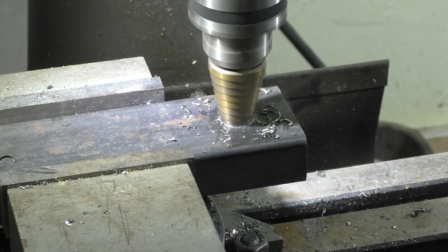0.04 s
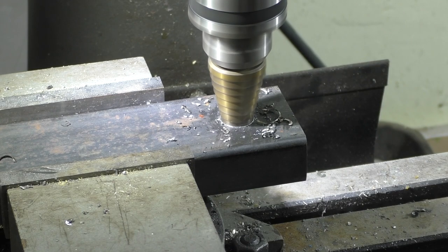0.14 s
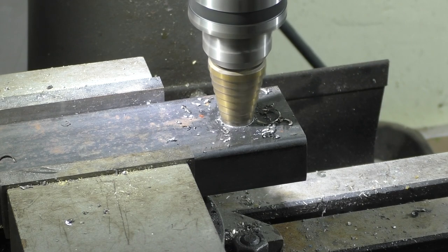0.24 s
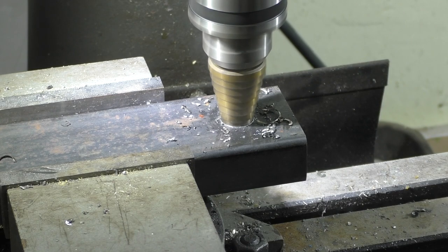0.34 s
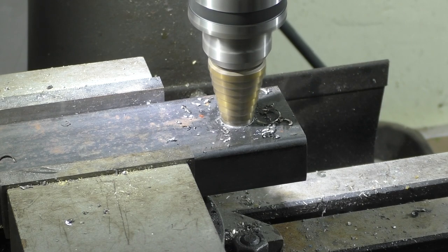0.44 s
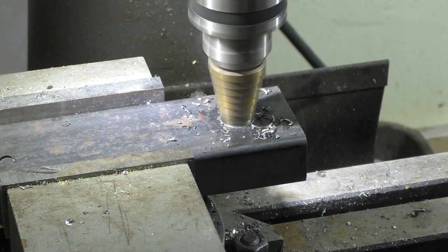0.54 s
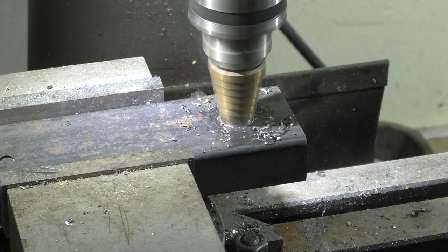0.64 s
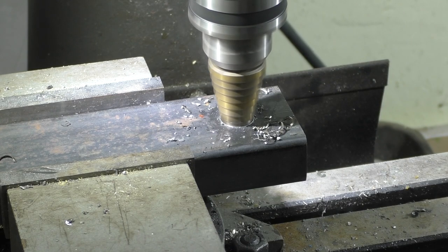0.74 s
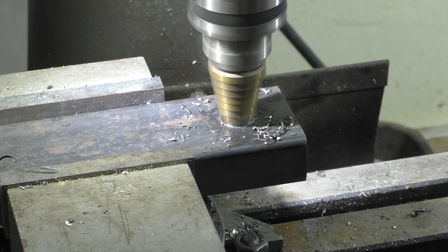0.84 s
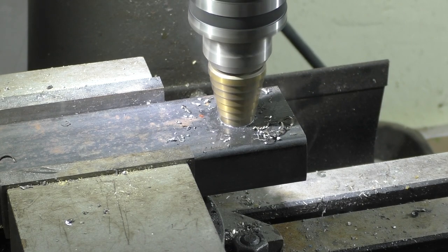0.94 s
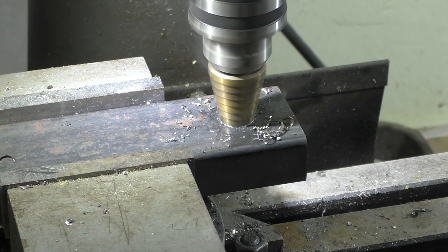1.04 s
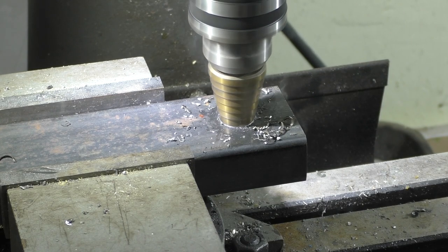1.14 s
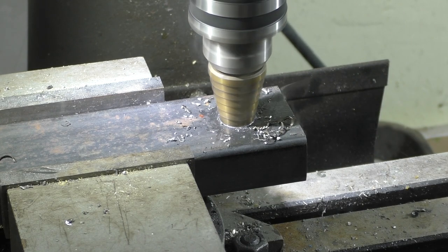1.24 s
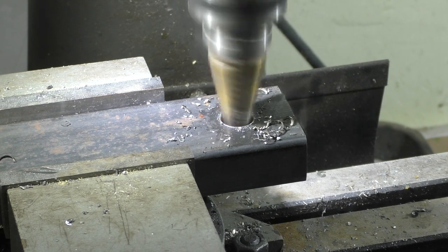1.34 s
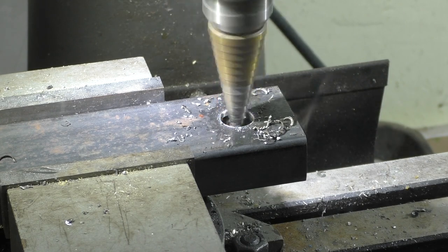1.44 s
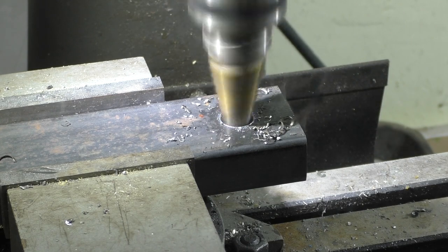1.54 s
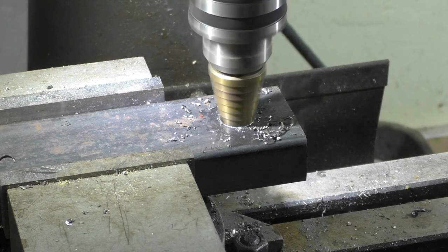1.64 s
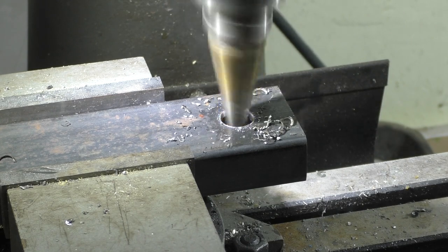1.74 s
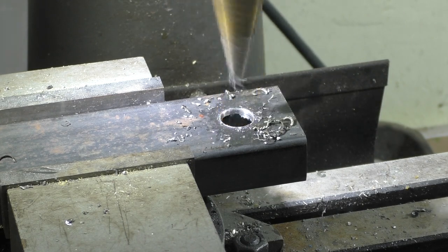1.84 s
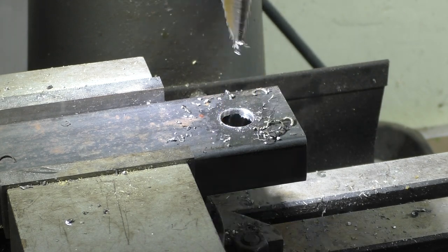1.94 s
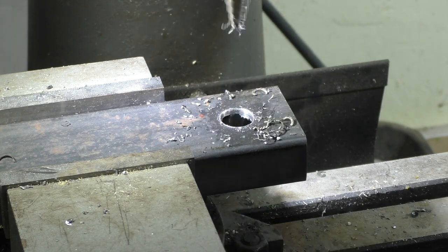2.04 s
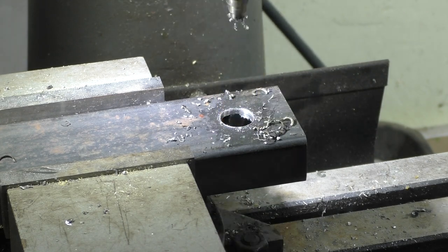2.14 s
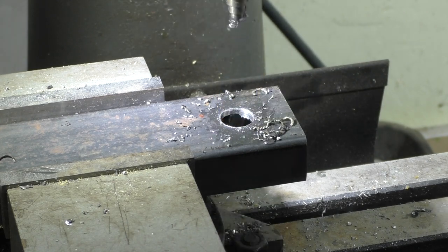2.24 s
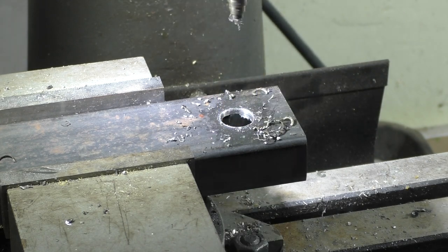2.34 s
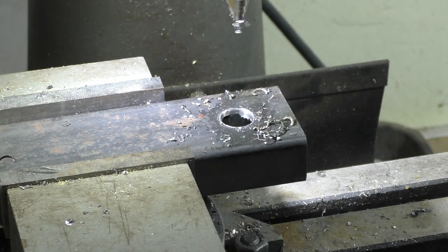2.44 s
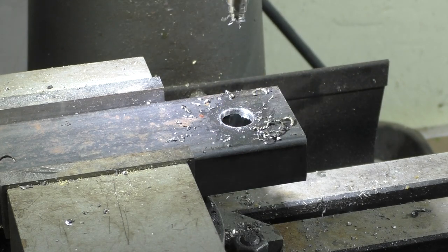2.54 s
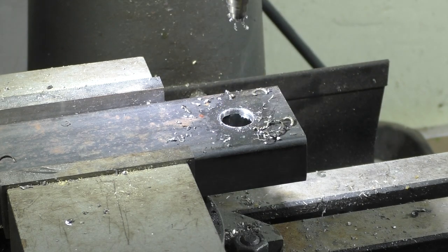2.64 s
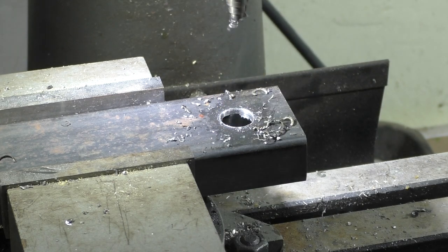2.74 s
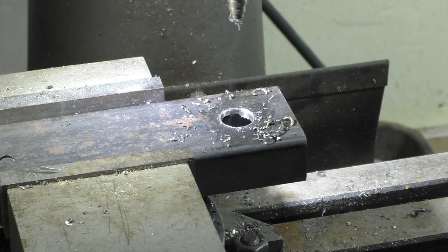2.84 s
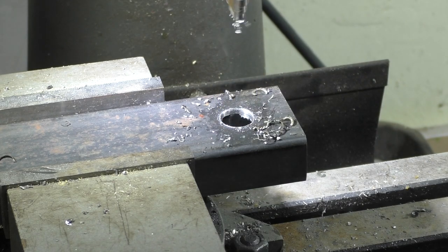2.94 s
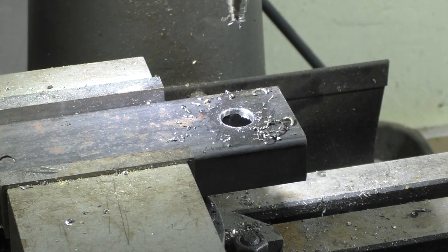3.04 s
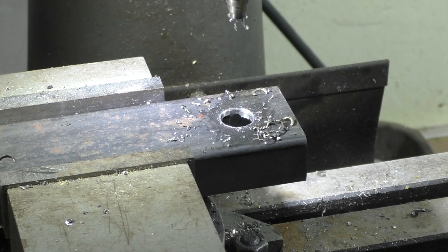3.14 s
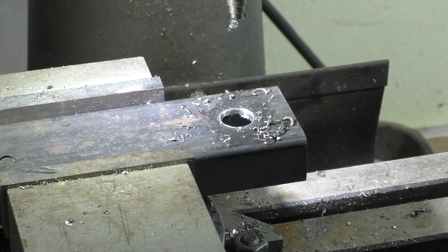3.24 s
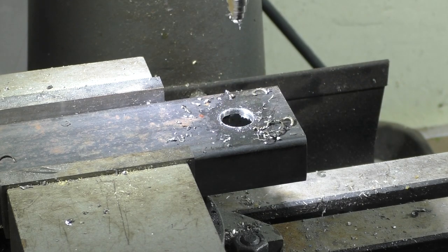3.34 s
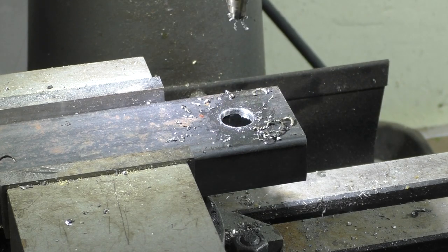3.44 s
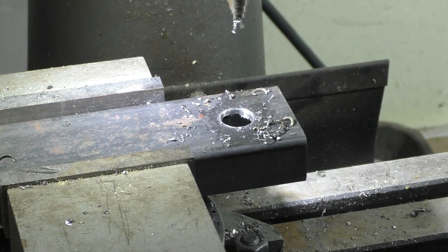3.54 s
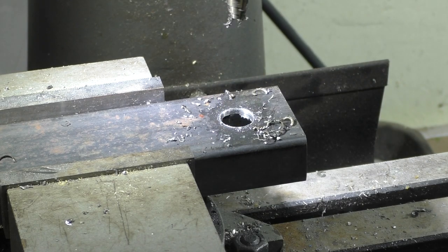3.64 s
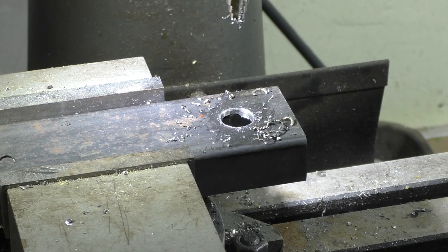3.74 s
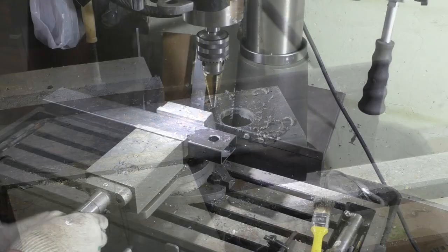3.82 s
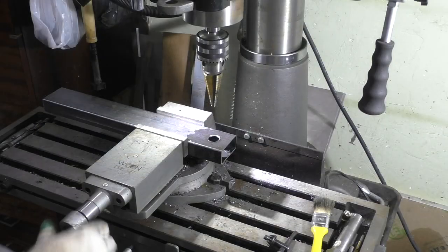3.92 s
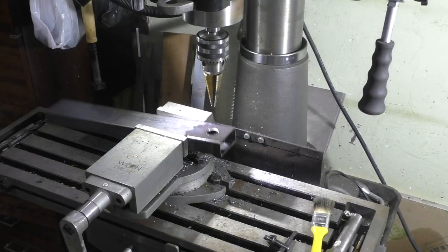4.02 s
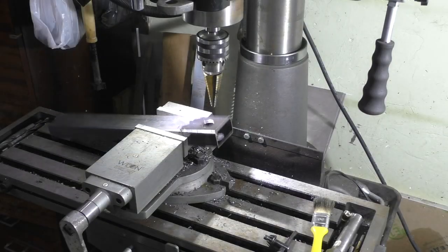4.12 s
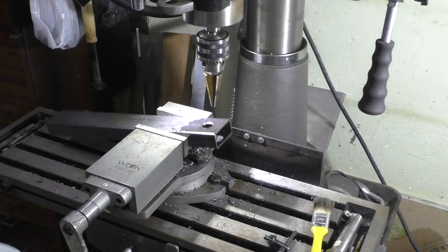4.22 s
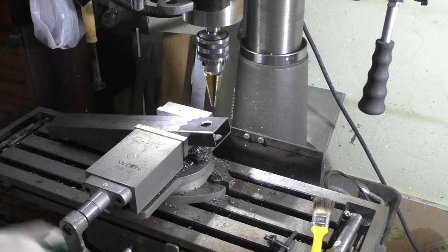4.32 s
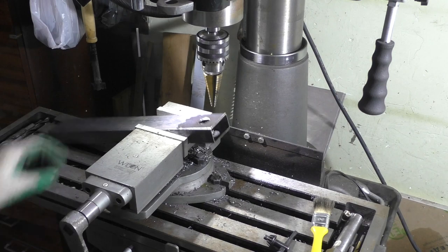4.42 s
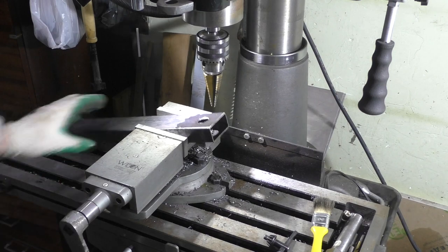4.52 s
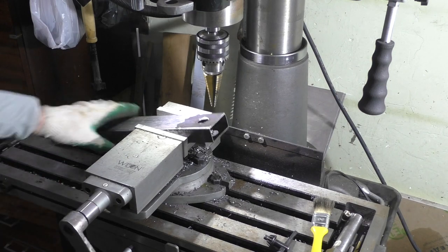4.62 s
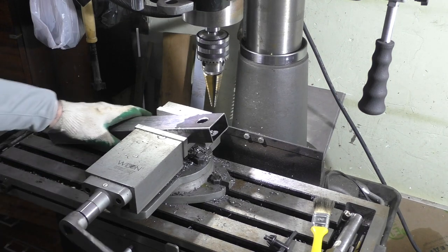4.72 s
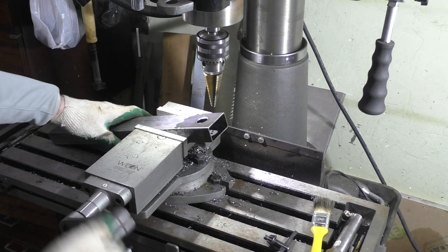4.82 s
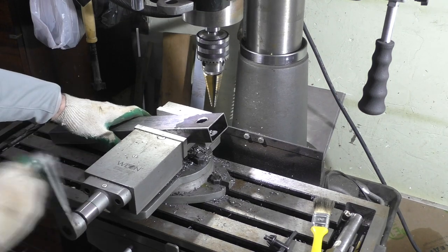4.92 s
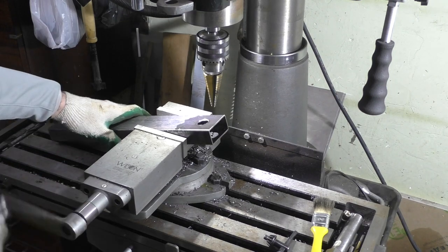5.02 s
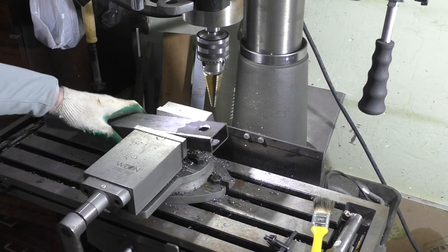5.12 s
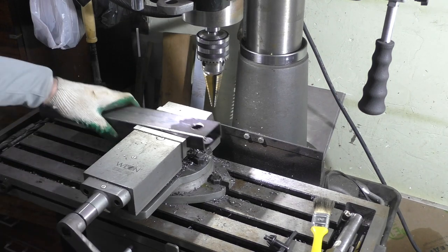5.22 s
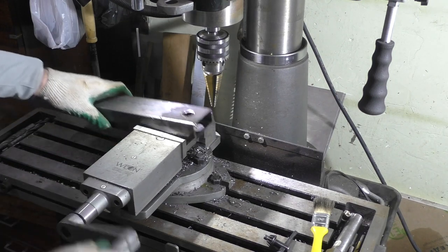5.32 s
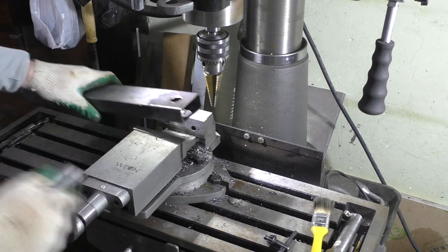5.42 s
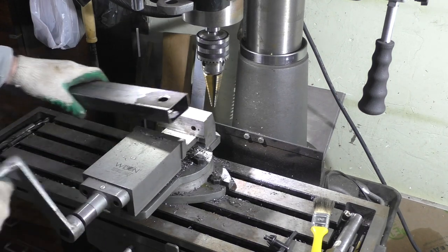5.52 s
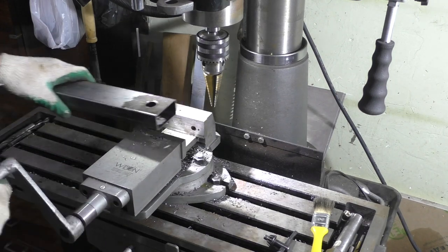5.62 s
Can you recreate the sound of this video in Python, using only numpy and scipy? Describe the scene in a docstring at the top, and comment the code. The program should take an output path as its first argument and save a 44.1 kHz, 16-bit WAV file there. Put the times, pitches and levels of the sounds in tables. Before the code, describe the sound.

Harsh metallic drilling with a low groan, a quiet motor whir, a switch clack, then several bright steel knocks as a tube is removed.

```python
"""A step drill cuts a steel tube: random tiny fractures, coloured and resonated, groan, grind, scrape, fizz.
A drill press hums and whirs (sines, coloured crackle); the bit bites twice more, the last time briefly.
The switch clacks (shaped impulse) and chips swish (crackle through steel modes). The loosened tube drops
and bounces on the vise: each knock clacks and rings decaying paired modes, until a gloved hand stills it
and lifts it out with a last knock. Early echoes and decaying noise tails form a small workshop."""
import sys
import numpy as np
from scipy import signal
from scipy.fft import rfft, irfft, next_fast_len
from scipy.io import wavfile
from scipy.ndimage import map_coordinates

SR = 44100
rng = np.random.default_rng(int(sys.argv[2]) if len(sys.argv) > 2 else 0)


def to_wav(s):
    """Save 16-bit WAV."""
    ch = np.atleast_2d(s).T  # columns
    pcm = np.round(np.clip(ch, -1, 1) * 32767)  # PCM
    wavfile.write(sys.argv[1], SR, pcm.astype(np.int16))


N = 250047
TIME = np.arange(N) / SR

# Levels in dB are relative; stages that share a sound add up.
# Room noise colour: hz, gain_db
AIR_COLOUR = [(25, -23), (90, -14.5), (180, -5.5), (400, -1.5), (800, -11.5), (2500, -11), (5000, -27),
              (15000, -31.5)]
# Room noise level: time_s, level_db
AIR_LEVEL = [(3.3, -74.5), (3.85, -74.5), (4.15, -70.5), (4.9, -80), (5.18, -78), (5.45, -74.5)]
# Workshop decay: hz, t60_s
ROOM_DECAY = [(200, 0.55), (600, 0.3), (3500, 0.39), (9000, 0.33), (16000, 0.12)]
TOP_HZ = 15500

# Mains hum partials: hz, level_db, waver_db
HUM_PARTIALS = [(100, 1, 0.8), (150.7, -16.5, 3.5), (203, -10, 3.5), (301.3, -6, 3)]
# Hum level: time_s, level_db
HUM_LEVEL = [(0, -56.5), (.8, -57), (1.35, -56), (1.68, -60.5), (2.22, -60.5), (2.34, -55), (2.56, -59),
             (3.3, -62)]
# Belt and bearing tones: hz, level_db
WHINE_TONES = [(748.3, -67.5), (769.8, -64), (872.1, -71), (926, -70), (1147, -67.5), (1193, -65),
               (3499, -78)]
# Whine level: time_s, level_db
WHINE_LEVEL = [(2.1, -8.5), (2.33, -6.5), (2.52, -15), (2.7, -3), (2.92, -8.5), (3.2, -9)]
# Spindle whir colour: hz, gain_db
WHIR_COLOUR = [(71, -34), (120, -13), (130, -14), (300, -2.5), (602, -13.5), (765, 2), (1030, -7),
               (1190, -1), (1360, -13), (1650, -10), (1850, -16.5), (2150, -14.5), (2790, -40),
               (3520, -18.5), (4680, -57.5), (12400, -68), (14000, -85)]
# Whir level: time_s, level_db
WHIR_LEVEL = [(2.05, -5), (2.48, -5.5), (2.7, -5), (2.95, -4), (3.2, -5)]
POWER_OFF_S, HUM_FALL_DB_PER_S = 3.36, 220
QUILL_UP_S, WHIR_DOWN_DB, WHIR_UP_DB = 2.02, -60.5, -54  # louder with the quill raised
COAST_DB_PER_S = 93  # run-down after the switch
# Pulley guard rattle colour: hz, gain_db
RATTLE_COLOUR = [(1500, -30), (2500, -2), (3100, -3), (3600, 2.5), (4150, -2.5), (4600, -16), (8000, -33),
                 (14000, -43)]
BELT_PASS_S, BELT_LAPS_PER_S, BELT_DB, BELT_SHARPNESS = 2.8, 5.77, -70, 1.8

# Switch clack colour: hz, gain_db
SWITCH_COLOUR = [(100, -60), (240, -12.5), (400, -23), (650, -13), (1000, -14), (1130, 3.5), (1320, 4),
                 (1500, -3), (1950, 3.5), (2350, -2.5), (2900, 0), (3500, -6), (4200, -12.5), (7000, -21),
                 (13000, -29), (16000, -49)]
# Housing shiver colour: hz, gain_db
HOUSING_COLOUR = [(60, -20), (250, -5.5), (600, -4), (1000, -5.5), (1300, 1.5), (2200, -5), (3000, -7.5),
                  (4400, -12), (5000, -22), (9000, -29), (16000, -43)]
# Housing panel resonances: hz, width_hz, level_db
CASING_MODES = [(1140, 40, -1), (1320, 58, 3), (1900, 70, 2), (2730, 90, -8), (2900, 70, -5),
                (3400, 80, -6)]
SWITCH_S, SWITCH_DB = 3.295, 1.5
HOUSING_DB, HOUSING_FALL_DB_PER_S = -37.5, 177
LEVER_LEAD_S, LEVER_LENGTH_S, LEVER_DB = 0.016, 0.031, -51.5

# Swarf hiss colour: hz, gain_db
SWISH_COLOUR = [(1060, -50), (2200, -39), (2800, -11), (3380, -2.5), (4830, 0.5), (5490, 2), (12000, -4),
                (16000, -8)]
# Resonances of the steel under the chips: hz, width_hz, level_db
PLATE_MODES = [(689.5, 12, 3.5), (730, 46, 1.5), (1238, 27, -5.5), (1706, 58, -13.5), (2024, 35, -16),
               (2420, 65, -2.5), (2557, 66, -4), (3330, 96, -1.5), (3480, 78, -4), (4140, 25, -5),
               (4520, 28, -1), (5560, 140, 4.5)]
# Chips sliding on: centre_s, length_s, level_db
SKITTER = (3.695, 0.088, -53)
FLICK_S, FLICK_DB, FLICK_RISE_DB_PER_S, FLICK_FALL_DB_PER_S = 3.647, -33, 1397.5, 405

# Steel contact colour: hz, gain_db
CONTACT_COLOUR = [(40, -57.5), (300, -43.5), (550, -31), (850, -18.5), (1400, -11.5), (2300, 2), (3100, -2),
                  (4500, -16.5), (9000, -22), (12000, -22.5), (16000, -39.5)]
# Rising quill jolts, then meets its stop: time_s, level_db
QUILL_KNOCKS = [(2.021, -48), (2.239, -17)]
# Tube meets vise: time_s, clack_db, ring_db, tilt_db_per_octave, clang_hz, focus_lift_db
KNOCKS = [(4.003, -38, -70, 0.5, 2430, 22.5), (4.041, -28, -61.5, 0, 2490, 11.5),
          (4.071, -31.5, -64, 8.5, 2400, 9), (4.2053, -7, -38, -1.5, 2570, -0.5),
          (4.385, -10, -40.5, 2, 2390, 1.5), (4.5231, -13.5, -40, 2.5, 2550, 2),
          (4.6416, -13.5, -41, 2, 2600, 2), (4.7471, -14.5, -41, 1, 2770, 3),
          (4.819, -17, -45.5, 2, 2400, 8.5), (4.858, -19.5, -44.5, 0.7, 3000, 10),
          (5.269, -19.5, -57.5, 3, 2890, 12), (5.276, -25.5, -52, 3.5, 1900, 8)]
# Free tube wall modes: hz, level_db
TUBE_MODES = [(1284, -12), (1390, -21), (1745, -12), (1945, -7), (2037, -7), (2140, -7), (2280, -7),
              (2322, -14), (2482, -8), (2560, -17), (2662, -9), (2744, -4), (2899, -9), (3045, -11),
              (3154, -14), (3290, -21), (3422, -7), (3634, -10), (3784, -12), (3855, -14), (4199, -23),
              (4350, -12), (4510, -16), (4646, -15), (4910, -21), (5160, -21), (5482, -19), (5720, -17),
              (6094, -18), (6311, -19), (6720, -27), (6912, -21), (7073, -28), (7429, -28), (7577, -24),
              (7708, -29), (8170, -30), (8367, -30), (8452, -30), (8657, -28), (8745, -28), (9012, -26),
              (9151, -23), (9474, -30), (9681, -22), (10433, -25), (10865, -28), (11208, -30), (11724, -34),
              (12069, -38), (12532, -39), (13050, -38)]
# Tube damping, from the glove: time_s, loss_db_per_s
GRIP_LOSS = [(4.83, 8), (4.93, 90), (5.03, 170), (5.18, 280), (5.27, 63), (5.6, 95)]
# Single tube modes that stand out at or between knocks: start_s, end_s, pitch_hz, level_db, release_db_per_s
SINGS = [(4.204, 4.279, 2268, -29.5, 900), (4.288, 4.303, 1293, -36.5, 700),
         (4.331, 4.343, 1270, -39.5, 200), (4.381, 4.42, 2270, -30.5, 400), (4.47, 4.536, 1943, -39.5, 200),
         (4.524, 4.553, 2280, -32, 600), (4.642, 4.666, 2295, -32.5, 301), (4.643, 4.653, 3424, -33, 300),
         (4.666, 4.676, 1290, -47, 400), (4.714, 4.73, 1285, -48.5, 399), (4.745, 4.778, 2287, -31, 500),
         (4.746, 4.749, 2742, -28.5, 221), (4.763, 4.781, 1270, -42, 499), (4.819, 4.827, 2300, -26, 600),
         (4.863, 4.867, 1293, -45, 600), (5.269, 5.271, 2737, -35, 202.5), (5.27, 5.272, 2483, -38, 199.5),
         (5.272, 5.273, 3420, -39, 230.5), (5.273, 5.276, 3043, -31, 420.5),
         (5.274, 5.279, 1974, -34.5, 403.5), (5.3, 5.376, 1960, -49, 72), (5.387, 5.398, 1261, -52, 140.5),
         (5.391, 5.397, 2270, -47.5, 300)]
# Loosened tube slides in the jaws: centre_s, length_s, level_db
SLIDES = [(3.991, .03, -69), (4.203, 0.029, -51.5), (5.353, 0.094, -48)]
# Rocking tube chatters on the jaws: start_s, end_s, level_db
JITTER = (4.28, 4.88, -46)
SING_RISE_DB_PER_S, SING_FLUTTER_CYCLES = 12000, 0.12
FOCUS_OCTAVES = 0.23  # half-width of the band a struck spot favours
RING_T60_S, RING_T60_SLOPE = 1.84, 0.37  # at 2300 Hz; higher modes die sooner
STRIKE_DB, STRIKE_T60_S = 8.5, .17  # on the jaws: louder, short
STRIKE_SHIFT = 0.011  # pitch pull by the jaws, as a share
RECONTACT_LOSS_DB = 3  # earlier ring lost at each knock
RUB_WIDTH_HZ = 47

# Bit cuts: start_s, end_s, level_db, release_db_per_s
BITES = [(0.0, 1.42, 1.5, 398), (1.666, 1.812, 1, 482), (2.238, 2.235, -2.5, 150)]
# Cut depth: time_s, depth_0_to_1
DEPTH = [(0, 1), (.945, 1), (1.0, 0), (1.22, 0.28), (1.41, 0.66), (1.68, 0.59), (1.82, 0.51), (2.24, 0.99)]
# Low cut colour: hz, gain_db
GROAN_COLOUR = [(30, -50), (80, -7), (140, -4.5), (215, 4.5), (330, -5.5), (480, 2.5), (620, 5.5),
                (760, 2.5), (1000, -35), (2000, -56)]
# Mid cut colour: hz, gain_db
GRIND_COLOUR = [(60, -70), (500, -16), (760, -1), (930, 7), (1060, -1), (1270, -11.5), (1470, 3),
                (1830, -17), (2400, 0), (3000, -5.5), (4200, -51), (16000, -70)]
# Cutting edge colour: hz, gain_db
SCRAPE_COLOUR = [(1180, -31), (2000, 10.5), (2110, 14), (2240, 3), (2560, 5), (3270, 5), (4490, -1),
                 (4990, -14), (5500, -6), (7150, -55), (12100, -120)]
# Treble cut colour: hz, gain_db
FIZZ_COLOUR = [(2820, -3.5), (4800, -1.5), (8400, -7), (9100, -8.5), (9860, -4.5), (12600, -19.5),
               (13900, -32), (15300, -14), (16000, -33)]
# Resonances of clamped tube and bit: hz, width_hz, level_db
CLAMPED_MODES = [(2069, 48, 1.5), (2644, 110, -2.5), (2980, 150, -2), (3207, 48, -2), (3610, 59, -3.5),
                 (4020, 50, -2.5), (4356, 60, -7.5), (4610, 69, -11), (5460, 46, -5), (6250, 37, -13.5),
                 (6850, 140, -12.5), (7530, 30, -14), (8390, 41, -6.5)]
# Vise resonances under a deep cut: hz, width_hz, level_db
VISE_MODES = [(488, 46, -2.5), (608, 90, 0.5), (766, 49, -1.5), (924, 23, 3.5), (1096, 46, -4.5),
              (1443, 110, -7)]
# Clamped tube antiresonance: hz, width_hz
HOLLOW = (1786, 370)
# Flutes grab a thick chip: centre_s, length_s, level_db
GRABS = [(0.125, 0.12, -47.5), (0.495, 0.014, -48.5), (0.935, 0.021, -46), (1.371, 0.14, -49.5),
         (1.696, 0.031, -50), (1.756, 0.04, -49)]
# Next step of the bit rasps on the rim: centre_s, length_s, level_db
CATCHES = [(1.027, 0.0067, -38), (1.044, 0.0073, -44)]
# Cutting edge squeals: centre_s, length_s, level_db, pitch_hz, roughness_cycles
SQUEALS = [(0.88, 0.012, -46.5, 3290, .12), (1.3, 0.009, -51, 4300, 0.13), (1.035, 0.024, -49, 4720, 0.14),
           (1.028, 0.015, -49, 2400, .15), (1.076, 0.026, -50, 2080, 0.079),
           (1.668, 0.019, -44, 2106, 0.036), (1.828, 0.016, -46.5, 2090, 0.043)]
# Swarf on the spinning bit: centre_s, length_s, level_db, centre_hz
SCRATCHES = [(1.921, 0.018, -67.5, 2940), (2.147, 0.072, -68.5, 7350), (2.537, 0.02, -68, 3260),
             (3.197, 0.059, -71.5, 5000)]
# Quill shudders at breakthrough and on springing back: centre_s, length_s, level_db
SHUDDERS = [(1.087, 0.054, -52.5), (1.39, 0.078, -53), (2.03, 0.035, -63), (2.298, 0.082, -51.5),
            (2.35, 0.52, -63)]
# Shudder colour: hz, gain_db
THUD_COLOUR = [(30, -26), (120, -9), (210, 2.5), (300, -2), (430, -8.5), (900, -32), (3000, -80)]
BITE_ATTACK_DB_PER_S = 1300
# dB at full depth, dB gained from skim to full depth
GROAN_LAW, GRIND_LAW, SCRAPE_LAW, FIZZ_LAW = (-54, 5.9), (-50.5, 14.7), (-48, 0), (-59, -6)
SKIM_HZ, SKIM_LOSS_DB = 2370, 19  # a skimming edge loses scrape and fizz below this
SCRATCH_WIDTH_HZ = 880  # at 3500 Hz, growing with pitch squared


def amp(db):
    """dB to gain."""
    return 10 ** (np.asarray(db) / 20)


def unit(x):
    """x at rms 1."""
    return x / np.sqrt(np.mean(x ** 2) + 1e-20)


def along(points, hz):
    """(hz, value) points interpolated on a log axis."""
    f, v = np.transpose(points)
    return np.interp(np.log(hz + 1), np.log(f + 1), v)


def curve(points):
    """(time_s, value) points joined by straight lines."""
    return np.interp(TIME, *np.transpose(points))


def envelope(start, end, rise, fall):
    """Gain 1 from start to end, flanks in dB per s."""
    return amp(-rise * np.maximum(start - TIME, 0) - fall * np.maximum(TIME - end, 0))


def swell(s, length, db):
    """Bell-shaped gain, 6 dB down at the ends of its length."""
    return amp(db - 6 * np.minimum(((TIME - s) / (length / 2)) ** 2, 20))


def wobble(rate):
    """Smooth random curve, rate knots per s."""
    knots = rng.standard_normal(int(N * rate / SR) + 4)
    return map_coordinates(knots, [TIME * rate])


def crackle(rate, spread_db):
    """Dense tiny fractures of random size, rate per s."""
    hits = rng.random(N) < rate / SR
    return unit(hits * rng.standard_normal(N) * amp(spread_db * rng.standard_normal(N)))


def filtered(x, response):
    """x times a complex response of frequency."""
    m = next_fast_len(N + SR // 2)
    return irfft(rfft(x, m) * response(np.fft.rfftfreq(m, 1 / SR)), m)[..., :N]


def coloured(x, spectrum):
    """x at rms 1 in the given colour."""
    return unit(filtered(x, lambda hz: amp(along(spectrum, hz))))


def resonate(x, peaks):
    """x at rms 1 through parallel resonances of alternating polarity."""
    def response(f):
        return sum((-1) ** k * amp(db) * 1j * f * width / (centre ** 2 - f * f + 1j * f * width)
                   for k, (centre, width, db) in enumerate(peaks))
    return unit(filtered(x, response))


def wandering(x, peaks, depth_db, rate=28):
    """x at rms 1 through resonances that flare independently as the contact shifts."""
    return unit(sum(amp(db + depth_db * wobble(rate)) * np.sqrt(width) * resonate(x, [(hz, width, 0)])
                    for hz, width, db in peaks))


def focus(hz, centre_hz):
    """1 in the band around the struck spot's pitch, falling to 0 outside."""
    return np.exp(-(np.log2((hz + 1) / centre_hz) / FOCUS_OCTAVES) ** 4)


def clack(spectrum, tilt_db, chatter, t60, focus_hz=2500, focus_db=0, size=4096):
    """Blow of energy 1: impulse and decaying chatter through a minimum-phase colour."""
    hz, t = np.fft.rfftfreq(size, 1 / SR), TIME[:size]
    tilt = tilt_db * np.log2(np.maximum(hz / 2000, 1))
    colour_db = along(spectrum, hz) + focus_db * focus(hz, focus_hz) + tilt
    cepstrum = irfft(np.log(amp(colour_db) + 1e-6))
    # folding the cepstrum makes the filter causal
    fold = np.r_[1, np.full(size // 2 - 1, 2), np.zeros(size // 2)]
    impulse_response = irfft(np.exp(rfft(cepstrum * fold)))
    rattle = rng.standard_normal(size) * amp(-60 * t / t60)
    force = (t == 0) + chatter * rattle / np.linalg.norm(rattle)
    blow = signal.fftconvolve(force, impulse_response)[:size]
    return blow / np.linalg.norm(blow)


def add(track, s, sound):
    """Lay a sound into a track at time s."""
    part = track[round(s * SR):][:len(sound)]
    part += sound[:len(part)]


def air():
    """Room noise: coloured noise on a slow level curve."""
    return amp(curve(AIR_LEVEL)) * coloured(rng.standard_normal(N), AIR_COLOUR)


def workshop(x, wet_db, side_db=-9):
    """Direct sound plus a noise tail with its own decay per frequency; side_db sets the width."""
    hz, t, z = signal.stft(rng.standard_normal((2, SR // 2)), SR, nperseg=256)
    decay = amp(-60 * t / along(ROOM_DECAY, hz)[:, None]) * (1 - np.exp(-t / 0.0014))
    tail = signal.istft(z * decay, SR, nperseg=256)[1]
    tail = tail / np.linalg.norm(tail[0])
    mid, side = amp(wet_db) * signal.fftconvolve(x[None], tail, axes=1)[:, :N]
    return x + mid + amp(side_db) * np.array([side, -side])


def nearby_steel(x, db, count=12):
    """Vise, table and column throw weak early echoes, partly shared by the two channels."""
    delay_s = rng.uniform(0.00199, .022, (count, 1))
    shared, own = rng.standard_normal(count), rng.standard_normal((2, count))
    gain = amp(db) * (shared + 1.92 * own) / np.sqrt(count)
    return x + filtered(x, lambda hz: gain @ np.exp(-2j * np.pi * hz * delay_s))


def motor():
    """Mains hum, and belt and bearing whir and whine, which fade after the switch."""
    hum = sum(amp(db + waver_db * wobble(10)) * np.sin(2 * np.pi * (hz * TIME + rng.random()))
              for hz, db, waver_db in HUM_PARTIALS)
    powered = amp(curve(HUM_LEVEL)) * envelope(0, POWER_OFF_S, 0, HUM_FALL_DB_PER_S)
    whine = unit(sum(amp(db + 1.7 * wobble(14)) * np.sin(2 * np.pi * (hz * TIME + 0.08 * wobble(16)))
                     for hz, db in WHINE_TONES))
    whir = coloured(crackle(6000, 1), WHIR_COLOUR) * amp(1.2 * wobble(25.0) + 1.1 * wobble(4.8))
    spindle_db = curve([(QUILL_UP_S - .01, WHIR_DOWN_DB), (QUILL_UP_S, WHIR_UP_DB)])
    running = amp(spindle_db) * envelope(0, SWITCH_S, 0, COAST_DB_PER_S)
    return powered * hum + running * (amp(curve(WHIR_LEVEL)) * whir + amp(curve(WHINE_LEVEL)) * whine)


def belt():
    """The belt's stiff spot rattles the pulley guard each lap, at a wandering level."""
    lap = np.exp(BELT_SHARPNESS * (np.cos(2 * np.pi * BELT_LAPS_PER_S * (TIME - BELT_PASS_S)) - 1))
    running = envelope(QUILL_UP_S, SWITCH_S, 898.8, COAST_DB_PER_S)
    rattle = coloured(crackle(1500, 2.4), RATTLE_COLOUR)
    return amp(BELT_DB + 4.8 * wobble(45)) * lap * running * rattle


def switch():
    """The lever rubs, then a hard clack with a short rattle; the housing shivers on."""
    shiver = amp(HOUSING_DB) * envelope(SWITCH_S, SWITCH_S, 2200, HOUSING_FALL_DB_PER_S)
    rub = swell(SWITCH_S - LEVER_LEAD_S, LEVER_LENGTH_S, LEVER_DB)
    panels = amp(-1.5) * coloured(crackle(600, 2.9), HOUSING_COLOUR)
    panels = panels + amp(-8.5) * wandering(crackle(500, 2), CASING_MODES, depth_db=4, rate=60)
    out = (shiver + rub) * panels
    add(out, SWITCH_S, amp(SWITCH_DB) * clack(SWITCH_COLOUR, tilt_db=-0.5, chatter=3.0, t60=0.031))
    return out


def chips():
    """A flick of swarf hisses over steel and makes it ring."""
    flick = amp(FLICK_DB) * envelope(FLICK_S, FLICK_S + 0.0018, FLICK_RISE_DB_PER_S, FLICK_FALL_DB_PER_S)
    grains = (flick + swell(*SKITTER)) * crackle(13000, 3.2)
    hiss = filtered(grains, lambda hz: amp(along(SWISH_COLOUR, hz)))
    return hiss + amp(-6.0) * np.std(grains) * resonate(grains, PLATE_MODES)


def quill_knocks():
    """The quill clacks on its way up."""
    out = np.zeros(N)
    for s, db in QUILL_KNOCKS:
        add(out, s, amp(db) * clack(CONTACT_COLOUR, tilt_db=4.0, chatter=3.0, t60=0.068))
    return out


def thumps(db=-27, push_s=0.001):
    """Knocks push the table: one short dull pulse each, far weaker for light ones."""
    out, u = np.zeros(N), TIME[:SR // 10] / push_s
    pulse = u * (2 - u) * np.exp(1 - u)
    for s, clack_db, *_ in KNOCKS:
        add(out, s, amp(db + 2.6 * clack_db) * pulse)
    return out


def slides(grit_db=-9):
    """Steel grates on steel as the tube shifts and chatters as it rocks; both stir its wall modes."""
    start, end, db = JITTER
    walls = [(hz, RUB_WIDTH_HZ, mode_db) for hz, mode_db in TUBE_MODES]
    chatter = amp(db + 2 * wobble(30)) * envelope(start, end, 600, 260) * resonate(crackle(900, 2), walls)
    grit = crackle(5400, 2.2)
    grating = resonate(grit, walls) + amp(grit_db) * coloured(grit, CONTACT_COLOUR)
    return chatter + sum(swell(*row) for row in SLIDES) * grating


def singing():
    """Single wall modes sound, each with its own start, end and release."""
    return sum(amp(db + 0.95 * wobble(40)) * envelope(start, end, SING_RISE_DB_PER_S, release)
               * np.sin(2 * np.pi * (hz * TIME + SING_FLUTTER_CYCLES * wobble(60)))
               for start, end, hz, db, release in SINGS)


def wall_modes():
    """Tube modes as columns hz, level_db, t60_s; decay shortens with pitch."""
    hz, db = np.transpose(TUBE_MODES)[:, :, None]
    return hz, db, RING_T60_S * (hz / 2300) ** -RING_T60_SLOPE


def damping():
    """Running total in dB of the tube's loss to the glove and to each jaw contact."""
    contacts = sum(np.clip((TIME - s) / .003, 0, 1) for s, *_ in KNOCKS)
    return np.cumsum(curve(GRIP_LOSS)) / SR + RECONTACT_LOSS_DB * contacts


def rocking(t, count, depth_db=3, rate=22):
    """As the tube rocks on the jaws, each mode swells and fades on its own."""
    knots = np.arange(80)
    return np.array([np.interp(t * rate, knots, amp(depth_db * (row - 0.53)))
                     for row in rng.standard_normal((count, len(knots)))])


def tube(split_hz=22, scatter_db=3.5, chatter=0.77, size=8192):
    """Each knock clacks, clangs briefly on the jaws and rings paired wall modes; the glove damps them."""
    clacks, ring = np.zeros(N), np.zeros(N)
    damped_db = damping()
    hz, mode_db, t60 = wall_modes()
    t = TIME[:SR]
    onset = 1 - np.exp(-t / .0016)
    detune, phase = rng.standard_normal((2, len(hz), 1))
    pair = np.sin(2 * np.pi * (hz * t + phase)) + .5 * np.sin(2 * np.pi * (hz + split_hz * detune) * t)
    modes = amp(mode_db - 60 * t / t60) * pair * rocking(t, len(hz))
    pressed = amp(mode_db + STRIKE_DB - 60 * t[:size] / STRIKE_T60_S)
    for s, clack_db, ring_db, tilt_db, clang_hz, focus_db in KNOCKS:
        # light contacts chatter more
        rattle = chatter * amp(-.4 * clack_db)
        blow = clack(CONTACT_COLOUR, tilt_db, rattle, 0.041, clang_hz, focus_db)
        add(clacks, s, amp(clack_db + 14.5) * blow)
        # every contact point favours other modes
        luck, side, pull = rng.standard_normal((3, len(hz)))
        colour_db = scatter_db * luck + tilt_db * np.log2(hz[:, 0] / 2500)
        colour_db = colour_db + 0.39 * focus_db * focus(hz[:, 0], clang_hz)
        weights = amp(ring_db + colour_db) * np.sign(side)
        pulled_hz = hz * (1 + STRIKE_SHIFT * pull[:, None])
        clang = weights @ (pressed * np.sin(2 * np.pi * pulled_hz * t[:size]))
        loss_db = np.interp(s + t, TIME, damped_db)
        # offsets the loss at the knock's own contact
        kept = amp(loss_db[0] + RECONTACT_LOSS_DB - loss_db)
        add(ring, s, weights @ modes * kept * onset)
        add(ring, s, clang * onset[:size])
    return clacks, ring


def bit_noises():
    """Stick-slip squeals of the edge, scrapes of swarf and the shudder of the quill."""
    squeal = sum(swell(s, length, db) * np.sin(2 * np.pi * (hz * TIME + rough * wobble(900)))
                 for s, length, db, hz, rough in SQUEALS)
    grit = crackle(6800, 1)
    scratch = sum(swell(s, length, db) * resonate(grit, [(hz, SCRATCH_WIDTH_HZ * (hz / 3500) ** 2, 0)])
                  for s, length, db, hz in SCRATCHES)
    shudder = sum(swell(*row) for row in SHUDDERS) * coloured(crackle(1200, 1.8), THUD_COLOUR)
    return squeal + scratch + shudder


def cutting(surge_db=0.9, uneven_db=1.0):
    """Steel shears in tiny fractures: deep cuts grind, skims fizz; load surges as chips form and break."""
    contact = sum(amp(db) * envelope(start, end, BITE_ATTACK_DB_PER_S, release)
                  for start, end, db, release in BITES)
    skim = 1 - curve(DEPTH)
    groan, grind, scrape, fizz = (contact * amp(db - span_db * skim)
                                  for db, span_db in (GROAN_LAW, GRIND_LAW, SCRAPE_LAW, FIZZ_LAW))
    groan = np.hypot(groan * amp(uneven_db * wobble(23.0)), sum(swell(*grab) for grab in GRABS))
    scrape = scrape + sum(swell(*row) for row in CATCHES)
    load = amp(surge_db * wobble(45.15))

    low = groan * unit(coloured(crackle(2000, 1.13), GROAN_COLOUR) * load)
    grinding = amp(-3.0) * coloured(crackle(600, 2.3), GRIND_COLOUR)
    vise = amp(-3.5) * wandering(crackle(700, 1.8), VISE_MODES, depth_db=3.5)
    rasp = grind * load * (grinding + vise)
    edge = scrape * unit(coloured(crackle(1500, 1.8), SCRAPE_COLOUR) * load)
    body = scrape * wandering(crackle(1200, 2.6), CLAMPED_MODES, depth_db=3)
    high = fizz * coloured(crackle(12000, 1.8), FIZZ_COLOUR)

    notch_hz, width_hz = HOLLOW
    notched = filtered(amp(-6) * edge + amp(-6.5) * body,
                       lambda hz: 1 - np.exp(-((hz - notch_hz) / (width_hz / 2)) ** 4))
    screech = notched + high
    lower = filtered(screech, lambda hz: 1 / (1 + (hz / SKIM_HZ) ** 24))
    return low + rasp + screech + (amp(-SKIM_LOSS_DB * skim) - 1) * lower


def scene():
    """Drill, switch, chips and tube in the workshop, over its quiet air."""
    clacks, ring = tube()
    drill = nearby_steel(cutting() + bit_noises(), db=-11.5) + motor() + belt()
    press = workshop(switch() + chips() + quill_knocks(), wet_db=-8.0, side_db=-5.0)
    steel = workshop(clacks, wet_db=-12, side_db=-2) + thumps()
    steel = steel + workshop(ring + slides(), wet_db=-7.5, side_db=-3.5)
    steel = steel + workshop(singing(), wet_db=-13, side_db=-3)
    balance = amp([[.2], [-.2]])  # dB, left and right
    return (drill + press + steel) * balance + workshop(air(), wet_db=0.5)


def record(dry):
    """Steep low-pass at TOP_HZ."""
    return filtered(dry, lambda hz: 1 / (1 + (hz / TOP_HZ) ** 80))


dry = scene()
out = record(dry)
to_wav(out)
```